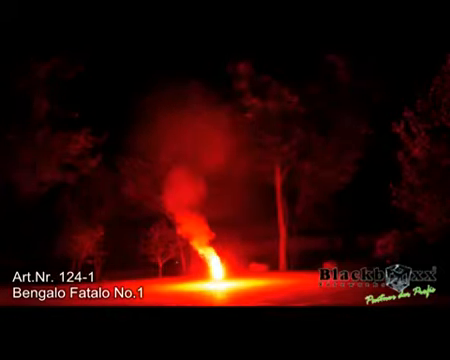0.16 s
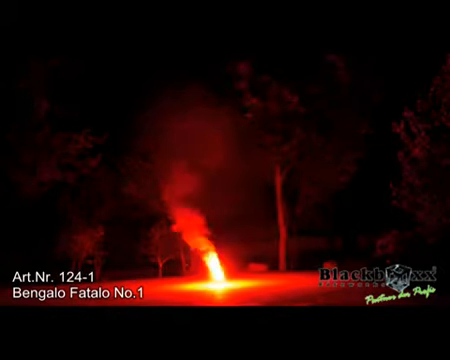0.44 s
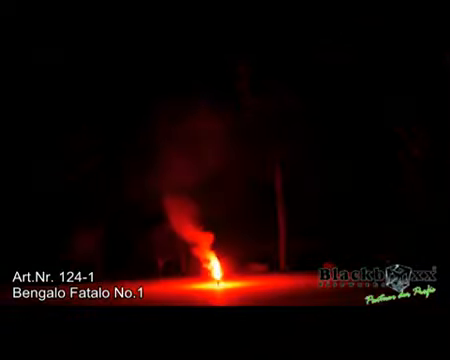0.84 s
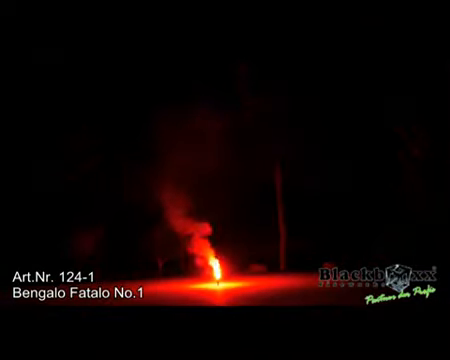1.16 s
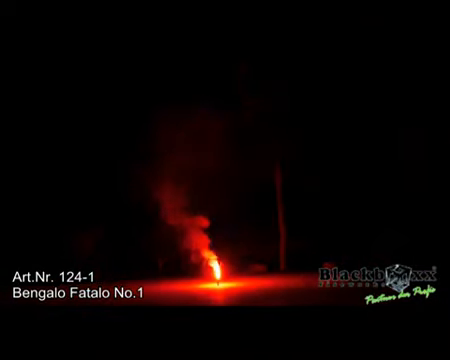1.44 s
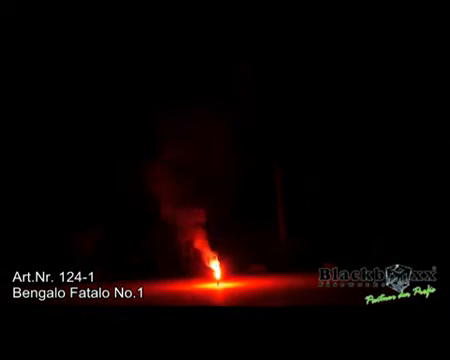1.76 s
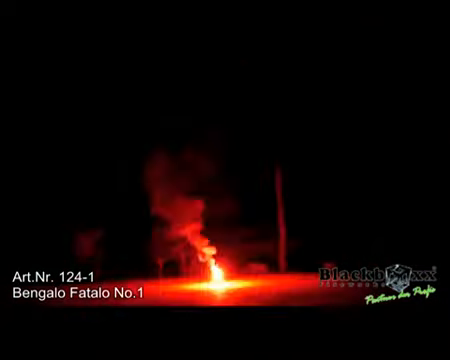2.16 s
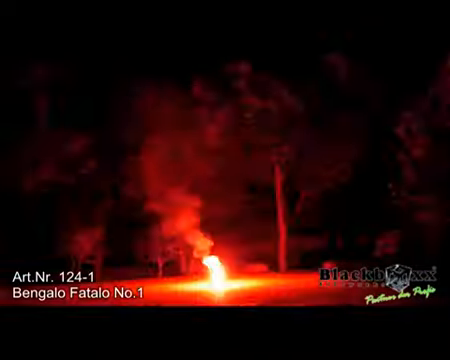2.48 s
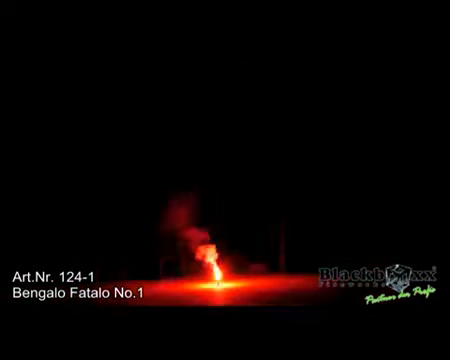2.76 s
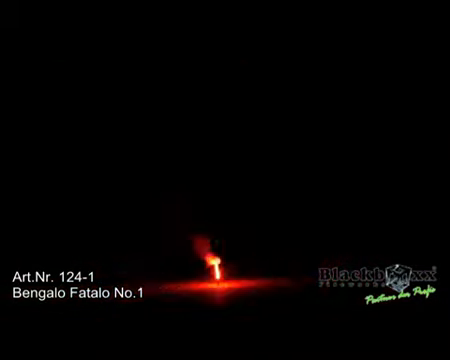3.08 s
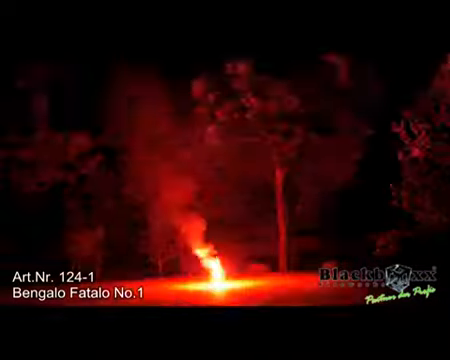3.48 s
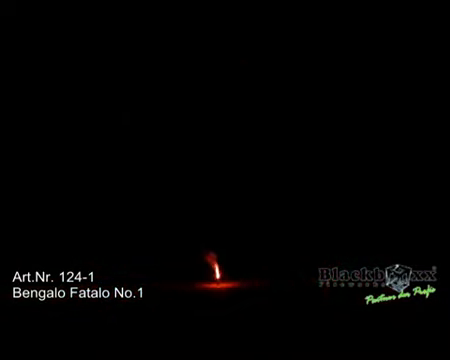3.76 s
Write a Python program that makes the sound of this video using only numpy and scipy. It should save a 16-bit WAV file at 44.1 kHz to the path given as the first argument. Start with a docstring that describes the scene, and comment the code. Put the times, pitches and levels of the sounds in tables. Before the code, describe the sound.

A flare burns with a steady airy hiss that gradually thins, then surges in short crackling bursts and pops dully once near the end; a cricket trills close on the left, more farther off, open ground at night.

```python
"""Open ground at night: a flare burns with a steady hiss that thins out, surges in short bursts and pops once.
The flare is fluttering noise with crackle in its surges; its hiss comes back as echoes and scatter from the trees.
The pop is one short knock with a bounce off the ground and a long, darkening roll.
A cricket trills close on the left with tones that sag in pitch; farther off, neighbours trill over a wash
of filtered noise that stands for many more, and a very faint insect whine lies on top."""
import sys
import numpy as np
from scipy import signal
from scipy.fft import rfft, irfft
from scipy.io import wavfile

SR = 44100
rng = np.random.default_rng(int(sys.argv[2]) if len(sys.argv) > 2 else 0)


def dump(signal):
    """Clip the signal to [-1, 1] and save it as 16-bit WAV at the path in sys.argv[1]."""
    limited = np.clip(np.atleast_2d(signal).T, -1, 1)
    pcm = np.round(limited * 32767).astype(np.int16)
    wavfile.write(sys.argv[1], SR, pcm)


N = 172872
T = np.arange(N) / SR  # time [s]

# Spectrum of the flame's surges and crackle: (frequency [Hz], relative density [dB])
SURGE_SPECTRUM = [(30, -52), (120, -24), (300, -9.5), (700, -2.5), (1400, 0), (2050, -5.5), (2900, 1),
                  (4200, -9.5), (6500, -15.5), (9500, -20.5), (11000, -20), (11600, -62), (15000, -44)]

STROKE_S = 0.023  # length of one cricket wing stroke


def amp(db):
    """Turns decibels into a gain."""
    return 10 ** (np.asarray(db) / 20)


def unit(x):
    """Scales a sound to rms 1."""
    return x / np.sqrt(np.mean(x ** 2) + 1e-20)


def read(points, hz):
    """Reads a spectrum in dB, interpolated along a log-frequency axis."""
    f, db = np.transpose(points)
    return np.interp(np.log(hz + 1), np.log(f + 1), db)


def colour(x, points):
    """Filters a sound by a spectrum, leaving its phases alone."""
    n = x.shape[-1]
    gain = amp(read(points, np.fft.rfftfreq(n, 1 / SR)))
    return irfft(rfft(x) * gain, n)


def drift(rate_hz):
    """Slow random motion of rms 1: noise kept below about rate_hz."""
    hz = np.fft.rfftfreq(N, 1 / SR)
    lowpass = (hz > 0) * np.exp(-(hz / rate_hz) ** 2)
    return unit(irfft(rfft(rng.standard_normal(N)) * lowpass, N))


def add(mix, s, sound):
    """Mixes a sound in at a time in seconds."""
    part = mix[..., max(round(s * SR), 0):][..., :sound.shape[-1]]
    part += sound[..., :part.shape[-1]]


def tail(t60):
    """A dying cloud of reflections: separate noise for each ear, of energy 1, falling 60 dB in t60 seconds."""
    t = T[:SR]
    onset = 1 - np.exp(-t / 0.0032)
    cloud = rng.standard_normal((2, SR)) * amp(-60 * t / t60) * onset
    return unit(cloud) / np.sqrt(SR)


def through(x, response):
    """Carries a mono sound to the two ears by convolution with a stereo response."""
    return signal.fftconvolve(x[None], response, axes=1)[:, :N]


def whine():
    """A faint, very high insect whine: a narrow band of noise, separate in each ear."""
    centre_hz, width_hz, level_db = 13420, 170, -77
    hz = np.fft.rfftfreq(N, 1 / SR)
    band = np.exp(-((hz - centre_hz) / width_hz) ** 2 / 2)
    return amp(level_db) * unit(irfft(rfft(rng.standard_normal((2, N))) * band, N))


def stroke(top_hz):
    """One cricket wing stroke: a tone that swells to a sharp crest, then sags in pitch as it fades."""
    sag_hz, sag_power, edge_s = 240, 4, 0.0032
    u = np.arange(0, 1, 1 / (STROKE_S * SR))  # progress through the stroke, 0 to 1
    hz = top_hz - sag_hz * u ** sag_power
    arch = np.sin(np.pi * u) ** .5
    crest = 1 / np.hypot(1, (u - .5) * STROKE_S / edge_s)
    return arch * crest * np.sin(2 * np.pi * (np.cumsum(hz) / SR + rng.random()))


def far_crickets(wander_hz=14, swell_db=1.1):
    """A few neighbours trill with a pulsing level, blurred by distance, over a noise wash of many more."""
    # Spectrum of the many: (frequency [Hz], relative density [dB])
    chorus_spectrum = [(4400, -42), (4900, -13.5), (5250, -2.5), (5450, 2.5), (5600, 7.5), (5800, 6),
                       (5920, -3.5), (6050, -24), (6300, -63), (8000, -90)]
    # Neighbouring crickets: (top pitch [Hz], stroke rate [1/s], relative level [dB])
    neighbours = [(5605, 33.5, -31), (5715, 37.5, -38.5), (5620, 35.5, -36.5)]
    # Swell of all the far crickets: (time [s], gain [dB])
    chorus_swell = [(0, -0.5), (.15, 0), (.4, -0.5), (.5, 0), (.7, -2.5), (.9, 0), (1.25, .5), (1.37, -1.5),
                    (1.47, 2.5), (2.12, -2), (2.24, -0.5), (2.4, 1), (2.7, 1), (3.06, 1.5), (3.17, -2),
                    (3.35, 0), (3.56, -0.5), (3.78, 1)]
    wash_db, left_db = -35.5, 0.83

    out = np.array([unit(colour(rng.standard_normal(N), chorus_spectrum)) for _ in range(2)])
    out *= amp(wash_db + swell_db * drift(10.0))
    for hz, rate, db in neighbours:
        song = np.zeros(N)
        for s in np.arange(0, N / SR, 1 / rate):
            add(song, s, stroke(hz + wander_hz * rng.standard_normal()))
        phase = 2 * np.pi * (3.2 * T + rng.random()) + .5 * drift(1.5)
        pulsing = np.clip(1.51 + np.sin(phase), 0, 1)  # dips to about half, some 3 times a second
        out += amp(db) * through(song * pulsing, tail(t60=0.13))
    balance = amp([[left_db], [-left_db]])
    return out * amp(np.interp(T, *np.transpose(chorus_swell))) * balance


def near_cricket(uneven_db=0.73, wander_hz=10):
    """Runs of evenly paced wing strokes, mostly on the left: the direct sound plus a short scatter."""
    # Trills: (middle of first stroke [s], length [s], stroke rate [1/s], relative level [dB])
    trills = [(0.015, .28, 34.5, -27), (0.3383, .12, 37, -31.5), (0.5167, .1, 36, -29.5),
              (.738, .18, 35.6, -29.5), (0.995, .32, 35.5, -27.5), (1.4433, .27, 38.7, -30),
              (1.772, .155, 35.4, -26.5), (1.9993, .21, 35.75, -25.5), (2.335, .145, 37.95, -27.5),
              (2.5707, .08, 31, -26), (2.663, .235, 36.1, -26), (2.9843, .205, 36.8, -26),
              (3.214, .235, 36.3, -26), (3.509, .19, 31.8, -27.5), (3.788, .125, 37.4, -24.5)]
    top_hz = 5730

    song = np.zeros(N)
    for start, length, rate, db in trills:
        for s in np.arange(0, length, 1 / rate):
            size_db = db + uneven_db * rng.standard_normal()
            tone = stroke(top_hz + wander_hz * rng.standard_normal())
            add(song, start + s - STROKE_S / 2, amp(size_db) * tone)
    paths = tail(t60=0.11) * amp([[-12], [-7]])
    paths[:, 0] += [1.25, .25]  # direct sound, left and right
    return through(song, paths)


def pop():
    """A pocket of gas bursts with a dull knock that bounces off the ground and rolls among the trees, darkening."""
    # Spectrum of the knock: (frequency [Hz], relative level [dB])
    knock_spectrum = [(30, -42), (80, -31), (150, -10.5), (280, -1), (500, -3), (760, 0), (1050, -16),
                      (2000, -31), (8000, -69)]
    pop_s, direct_db, roll_db = 3.5977, -10.5, -8.5
    bounce_delay_s, bounce_gain = 0.0029, 0.46  # gain relative to the direct knock
    split_hz, lower_t60_s, upper_t60_s, upper_db = 490, 1.4, 0.75, -3.5

    # Minimum phase packs the knock's energy at its start.
    size = 4096
    log_gain = np.log(amp(read(knock_spectrum, abs(np.fft.fftfreq(size, 1 / SR)))))
    knock = np.fft.ifft(np.exp(np.conj(signal.hilbert(log_gain)))).real

    # The upper part of the roll dies sooner than the bass.
    bass = 1 / (1 + (np.fft.rfftfreq(SR, 1 / SR) / split_hz) ** 4)  # share of power
    lower = rfft(tail(lower_t60_s)) * np.sqrt(bass)
    upper = rfft(tail(upper_t60_s)) * np.sqrt(1 - bass) * amp(upper_db)
    roll = irfft(lower + upper, SR)
    roll[:, SR // 2:] = 0

    paths = amp(roll_db) * (1.07 * roll + 0.69 * roll[::-1])  # each ear also gets the other's roll
    paths[:, 0] += amp(direct_db)
    add(paths, bounce_delay_s, np.full((2, 1), bounce_gain * amp(direct_db)))
    out = np.zeros((2, N))
    add(out, pop_s, through(knock / np.linalg.norm(knock), paths))
    return out


def gas(spectrum, flutter_db, flutter_hz):
    """Turbulent gas: coloured noise whose level flutters at random, of rms 1."""
    noise = colour(rng.standard_normal(N), spectrum)
    return unit(noise * amp(flutter_db * drift(flutter_hz)))


def crackle():
    """Tiny bursts of burning grains: random clicks of either sign, a few much louder than the rest."""
    grains_per_s, spread_db = 1000, 4
    size = amp(spread_db * np.minimum(rng.exponential(1, N), 4)) * rng.choice([-1, 1], N)
    struck = rng.random(N) < grains_per_s / SR
    return unit(colour(size * struck, SURGE_SPECTRUM))


def flare(gust_db=.5):
    """Roar, fizz and surges leave one point and arrive directly, as echoes, and as scatter shifting in the hot air."""
    # Steady burn: (time [s], relative roar level [dB], relative fizz level [dB])
    burn = [(0, -43.5, -52.5), (.3, -43, -49), (0.498, -44.5, -50.5), (0.701, -44.5, -50.5),
            (.82, -44.5, -55), (1.2, -45.5, -56), (1.36, -45.5, -53.5), (1.5, -46, -56), (1.75, -47, -57),
            (1.98, -47.5, -57.5), (2.2, -50.5, -60), (2.8, -48.5, -58), (3.22, -46.5, -56.5),
            (3.34, -48, -58.5), (3.45, -46, -59), (3.51, -49, -60.5), (3.82, -50.5, -57.5),
            (3.92, -55.5, -62)]
    # Surges of the flame: (peak time [s], time from peak to 0.42 of its height [s], relative level [dB])
    surges = [(1.83, 0.047, -45.5), (2.305, 0.033, -44.5), (2.402, 0.028, -47.5), (2.599, 0.051, -40),
              (2.928, 0.036, -44), (3.103, 0.047, -39.5), (3.594, 0.048, -38), (3.7, .05, -47),
              (3.819, 0.041, -46)]
    # Spectra of the roar and the fizz: (frequency [Hz], relative density [dB])
    roar_spectrum = [(25, -50), (70, -44), (125, -21), (240, -9.5), (550, -2.5), (800, 0), (1400, 0),
                     (2050, -6), (3000, 1.5), (4200, -5.5), (6500, -14), (11000, -82), (15000, -68)]
    fizz_spectrum = [(60, -68), (1000, -2), (4000, -2), (6400, -6.5), (7400, 2), (8600, -1.5), (9500, 7),
                     (10200, -2), (11050, 0.5), (11500, -89), (14500, -23)]
    # Early reflections: (delay [s], left gain [ratio], right gain [ratio])
    echoes = [(.0187, .24, .03), (.0213, 0.1, .04), (0.0242, .03, 0.15)]
    # Colour of the scatter from the trees: (frequency [Hz], relative gain [dB])
    scatter_colour = [(100, -18), (300, -6.5), (700, -4.5), (1500, 0.5), (3000, 2.5), (10000, 0.5)]

    s, roar_db, fizz_db = np.transpose(burn)
    jet = gas(roar_spectrum, flutter_db=1.0, flutter_hz=50.7) * amp(np.interp(T, s, roar_db))
    jet += gas(fizz_spectrum, flutter_db=3.0, flutter_hz=88.5) * amp(np.interp(T, s, fizz_db))
    surge = sum(amp(db) * np.exp(-.87 * ((T - at) / width) ** 2) for at, width, db in surges)
    rush = .85 * gas(SURGE_SPECTRUM, flutter_db=3.5, flutter_hz=119)
    jet += (rush + amp(-3) * crackle()) * surge
    jet *= amp(gust_db * drift(25))

    paths = np.zeros((2, SR // 10))
    paths[:, 0] = [.78, .92]  # direct sound, left and right
    for delay, left, right in echoes:
        add(paths, delay, np.array([[left], [right]]))

    # Six clouds of scatter trade shares of the jet while their total power holds.
    shares = np.array([drift(9.7) for _ in range(6)])
    shares /= np.linalg.norm(shares, axis=0)
    clouds = sum(through(jet * share, tail(t60=0.28)) for share in shares)
    scatter = colour(clouds, scatter_colour)
    return (through(jet, paths) + scatter) * amp([[-1.2], [-2.8]])


def scene():
    """The flare among the insects, from the farthest layer to the main source."""
    return whine() + far_crickets() + near_cricket() + pop() + flare()


def record(dry):
    """The recorder's bass cut and band limit."""
    low_cut_hz, top_hz = 69, 15000
    thinned = signal.sosfilt(signal.butter(2, low_cut_hz, "highpass", fs=SR, output="sos"), dry)
    band_limit = signal.firwin(511, top_hz, window=("kaiser", 9), fs=SR)
    return signal.oaconvolve(thinned, band_limit[None], "same")


dry = scene()
out = record(dry)
dump(out)
```